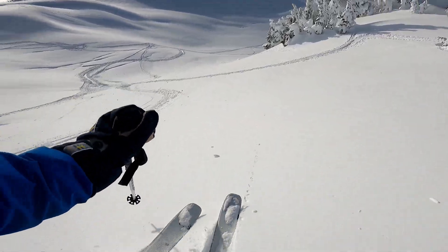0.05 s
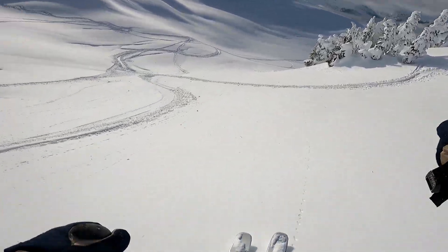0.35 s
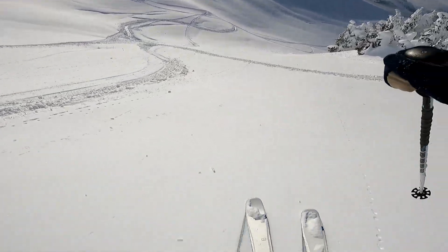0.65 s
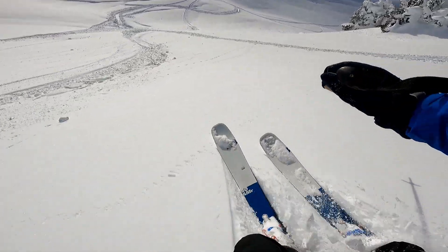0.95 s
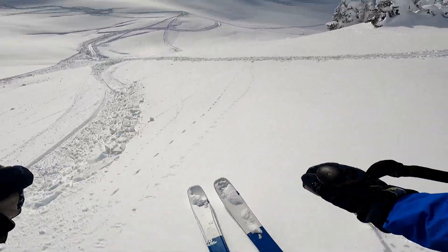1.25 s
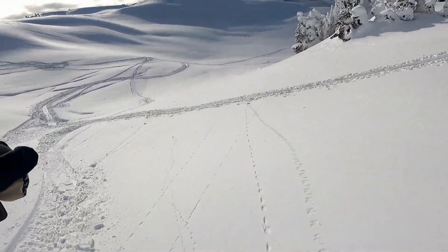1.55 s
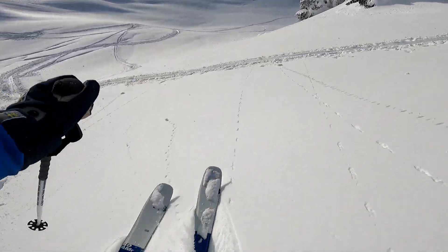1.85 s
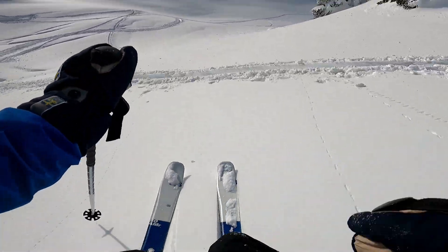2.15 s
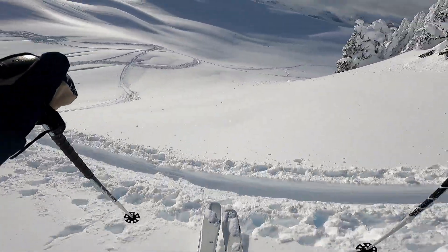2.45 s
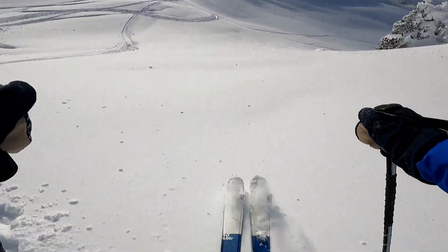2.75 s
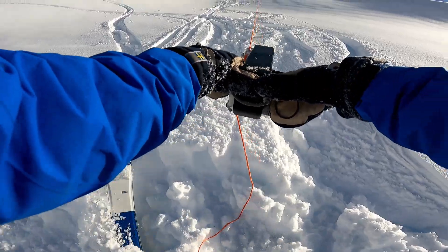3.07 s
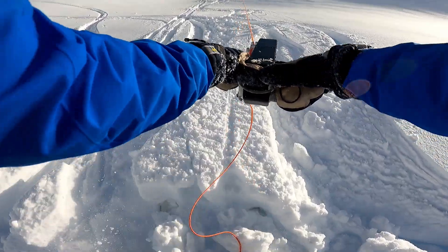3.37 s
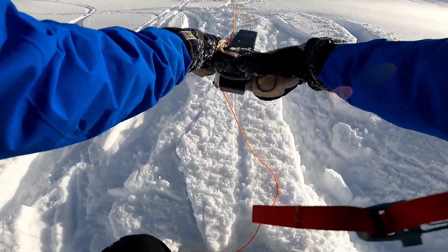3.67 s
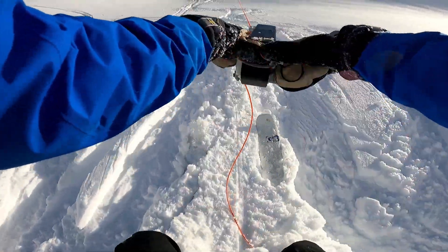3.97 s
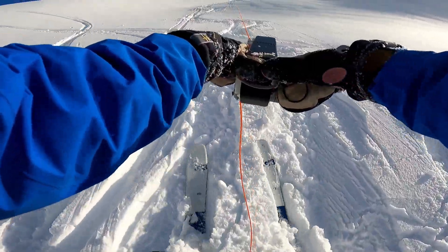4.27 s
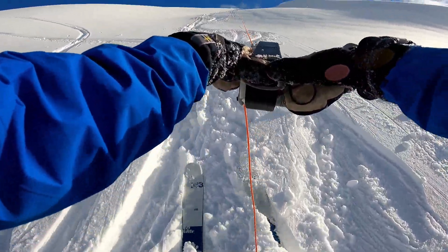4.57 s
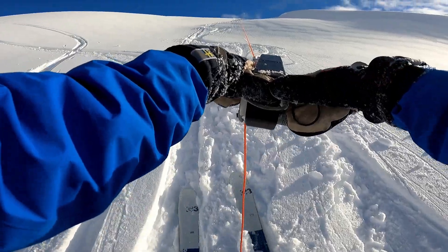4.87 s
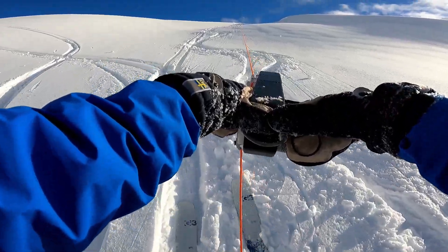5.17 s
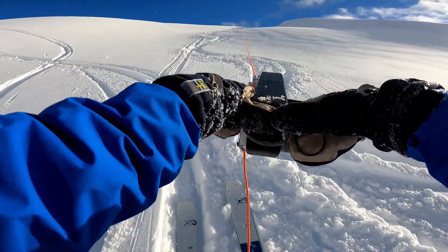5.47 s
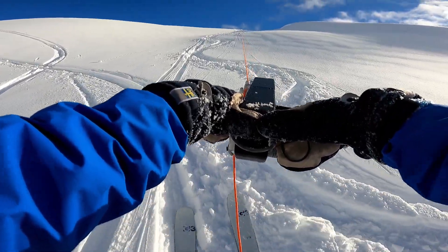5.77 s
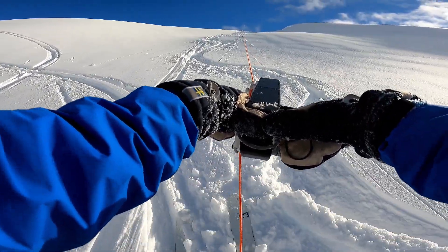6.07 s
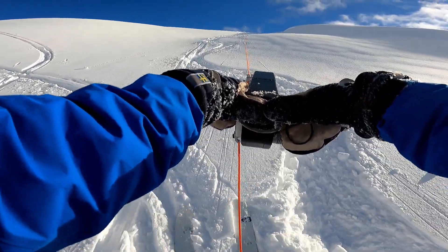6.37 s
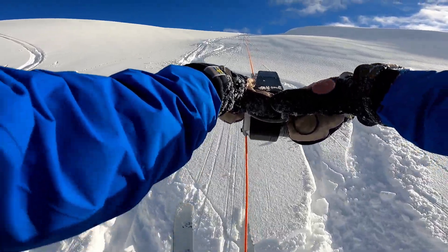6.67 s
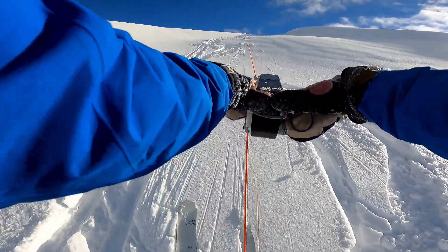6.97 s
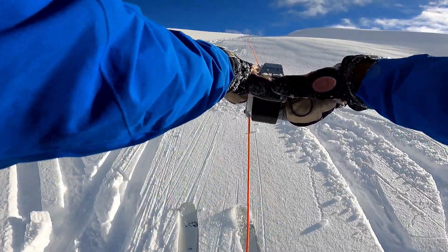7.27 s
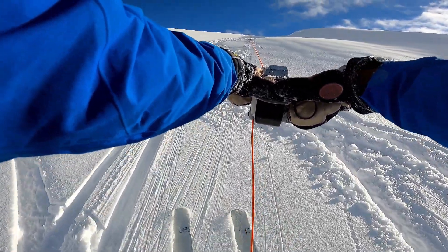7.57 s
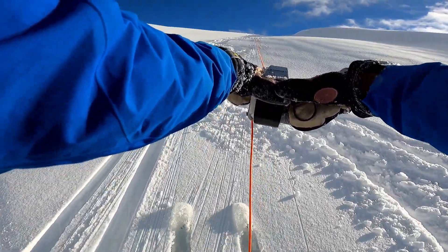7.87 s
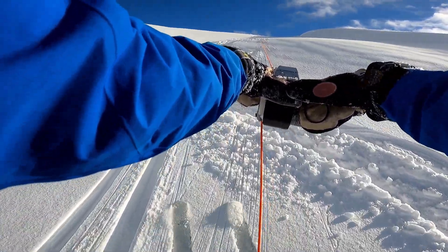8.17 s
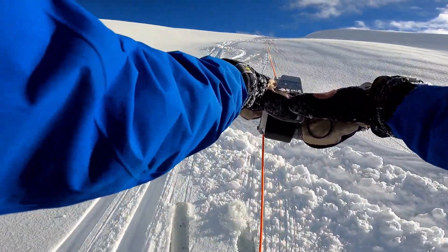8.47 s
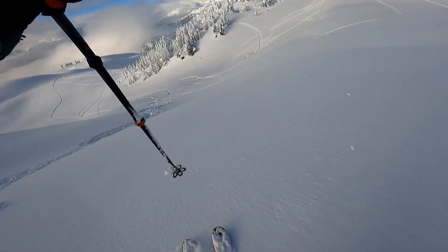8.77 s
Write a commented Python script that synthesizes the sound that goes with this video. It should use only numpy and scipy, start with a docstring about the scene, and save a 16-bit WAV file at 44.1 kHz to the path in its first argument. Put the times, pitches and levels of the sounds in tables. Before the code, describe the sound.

Gusts of wind rumble on a body-worn microphone as a skier turns through powder, the skis crunching and hissing, with a few knocks and a tap on a pole. Abruptly a hand-held electric rope tow takes over close by: its geared motor growls, speeds up, sags under load, then whines steadily with rattling gears over a low rumble of skis. The windy descent cuts back in with two thumps.

```python
"""Gusts of wind buffet a body camera as a skier runs through powder. In each turn the skis crunch the snow and
throw up a hiss; they knock over lumps, and a pole is struck. The scene changes abruptly to a hand-held electric
rope tow: its geared motor growls, speeds up, sags under the load, then whines steadily as it winds in the rope,
its gear teeth rattling the housing. Just as abruptly the scene changes back to the windy descent, with a few
thumps."""
import sys
import numpy as np
from scipy import signal
from scipy.fft import rfft, irfft, next_fast_len
from scipy.io import wavfile
from scipy.ndimage import uniform_filter1d, map_coordinates

SR = 44100
rng = np.random.default_rng(int(sys.argv[2]) if len(sys.argv) > 2 else 0)


def to_wav(sig):
    """Store sig (one row per channel, or 1-D mono) as 16-bit WAV at the path in sys.argv[1].

    Samples outside -1..1 are clipped; the rate is SR.
    """
    pcm = np.clip(np.atleast_2d(sig), -1, 1) * 32767
    pcm = np.round(pcm).astype(np.int16)
    wavfile.write(sys.argv[1], SR, pcm.T)  # frames by channels


N = 398223
TIME, HZ = np.arange(N) / SR, np.fft.rfftfreq(N, 1 / SR)
TOW_START_S, TOW_END_S = 2.836, 8.643
CRUISE_HZ, DRUM_RATIO = 373, 20  # motor turns a second when cruising; motor turns per rope drum turn

# The deep tone of wind on the microphone: pitch_hz, level_db
WIND_COLOUR = [(8.8, -31), (15, 1.5), (43, 3), (85, -1), (128, -5.5), (173, -18), (247, -15.5),
               (400, -25.5), (520, -72), (880, -120)]
# Gusts that rise above the steady airflow: start_s, end_s, boost_db
GUSTS = [(-0.1, 0.246, 5), (0.464, 1.236, 7), (1.684, 2.21, 5), (2.38, 2.596, 5.5), (2.688, 2.84, 8),
         (8.608, 8.752, 8)]

def wind(level_db=-25.5, edge_s=0.013, after_tow_db=0.5):
    """Rushing air shakes the microphone, making a rumble that jumps with each gust."""
    gust_db = sum(db / 2 * (np.tanh((TIME - start) / edge_s) - np.tanh((TIME - end) / edge_s))
                  for start, end, db in GUSTS)
    rumble = coloured(rng.standard_normal(N), read(WIND_COLOUR, HZ))
    buffeting = evened(np.tanh(0.27 * rumble))  # gently squash the peaks
    return gain_of(level_db + after_tow_db * (TIME > TOW_END_S) + gust_db + 1.4 * drift(12)) * buffeting


# Ski turns, each pressing on the edges and letting go: middle_s, half_length_s, load_factor
SKI_TURNS = [(-0.05, 0.25, 0.72), (0.88, 0.35, 1.1), (2.06, 0.46, 1.1), (2.745, 0.26, 0.91)]
# The low crunch of snow being packed: pitch_hz, level_db
PACKING_COLOUR = [(90, 2.5), (190, 6.5), (350, 0.5), (700, -0.5), (1400, -7), (2800, -19), (6000, -57),
                  (12000, -82)]
# The brighter sound of coarse spray: pitch_hz, level_db
SPRAY_COLOUR = [(600, 3), (1500, -0.5), (3000, -2), (4000, -8.5), (6000, -15), (12000, -48)]

def snow_crunch(packing_db=-39, spray_db=-51, after_tow_db=-3.5):
    """Snow packs in tiny collapses and sprays off the ski edges, loudest in the turns."""
    load = sum(peak * np.exp(-abs((TIME - s) / half) ** 1.94) for s, half, peak in SKI_TURNS)
    packing = coloured(rng.standard_normal(N) * gain_of(2 * drift(103)), read(PACKING_COLOUR, HZ))
    spray = coloured(rng.standard_normal(N) * gain_of(2 * drift(400)), read(SPRAY_COLOUR, HZ))
    snow = gain_of(packing_db + 9.5 * load) * packing + gain_of(spray_db + 11 * load) * spray
    return gain_of(after_tow_db * (TIME > TOW_END_S) + drift(5.6)) * snow


# How the powder's hiss rises and falls: time_s, level_db
HISS_LEVEL = [(0.0, -46.5), (0.32, -52), (0.35, -56.5), (0.54, -57), (0.55, -51.5), (0.68, -46),
              (1.22, -45), (1.63, -56.5), (1.67, -52), (1.88, -44), (2.24, -41.5), (2.27, -46), (2.62, -55),
              (2.77, -51)]
# The thin, high tone of flying powder: pitch_hz, level_db
HISS_COLOUR = [(1500, -21), (3000, 1.5), (4200, 0), (5500, -2.5), (7000, -5.5), (9000, -13.5), (12000, -25),
               (14500, -42)]

def powder_hiss(boost_db=2.5, after_tow_db=-60):
    """Fine powder flies off the edges: it builds through each turn and hushes in between."""
    level_db = np.where(TIME > TOW_END_S, after_tow_db, curves(HISS_LEVEL)[0] + boost_db) + drift(17)
    grains = rng.standard_normal(N) * gain_of(drift(400))
    return gain_of(level_db) * coloured(grains, read(HISS_COLOUR, HZ))


# Hard snow and gear hitting the skis: start_s, level_db, pitch_hz, fade_s (time to fall 60 dB)
CLACKS = [(0.183, -18, 1110, .009), (0.4738, -9.5, 1900, 0.0027), (0.5395, -18, 1150, .008),
          (1.2555, -19, 1100, 0.0045), (2.277, -15.5, 720, .012), (2.441, -15, 700, 0.011),
          (2.62, -21, 1700, .008), (2.33, -16, 1000, .012), (2.358, -18, 1300, .01)]

def clacks():
    """Each hard, sharp hit rings for only a few vibrations."""
    out, t = np.zeros(N), np.arange(SR // 4) / SR
    for s, db, hz, fade_s in CLACKS:
        add(out, s, gain_of(db - 60 * t / fade_s) * np.sin(2 * np.pi * hz * t))
    return out


# Skis and gear bumping over lumps: start_s, level_db, pitch_hz, fade_s
KNOCKS = [(.695, -9, 280, 0.043), (.815, -26, 1800, .025), (.864, -21, 700, 0.043),
          (.913, -23, 2300, 0.068), (.922, -15, 600, 0.045), (.992, -15, 577, 0.25),
          (1.039, -12, 513, 0.074), (.997, -17, 1150, .15), (2.056, -20, 1700, .02), (2.11, -11, 220, 0.14),
          (2.21, -21, 3900, 0.025), (2.204, -13, 450, .035), (2.393, -9.5, 280, .05),
          (2.732, -16, 1200, 0.022), (2.787, -7, 452, 0.04), (3.04, -16, 275, 0.062),
          (3.315, -6, 369.2, 0.036), (3.465, -14, 317.8, 0.077), (8.648, -6.5, 400, .07),
          (8.664, -13.5, 1100, 0.019), (8.669, -11, 590, 0.034), (8.747, -6, 320, .04),
          (8.749, -19, 800, 0.023), (8.75, -27, 1900, 0.018)]

def knocks(trim_db=-5.5, spread=1.41):
    """Each bump is a dull crunch: a burst of noise around one pitch that dies quickly."""
    out, t = np.zeros(N), np.arange(SR // 4) / SR
    for s, db, hz, fade_s in KNOCKS:
        band = signal.butter(2, [hz / spread, hz * spread], "band", fs=SR)
        crunch = evened(signal.lfilter(*band, rng.standard_normal(len(t))))
        add(out, s, crunch * gain_of(db + trim_db - 60 * t / fade_s) * np.minimum(t / 0.001, 1))
    return out


def old_tracks(level_db=-28, middle_s=2.36, half_length_s=0.34, pitch_hz=184):
    """A low rumble swells and fades as the skis chatter across old tracks."""
    band = 1 / (1 + (1.42 * np.log2((HZ + 1) / pitch_hz)) ** 4)
    rumble = evened(filtered(rng.standard_normal(N), band))
    return gain_of(level_db) * hump(middle_s, half_length_s) * rumble


# A hit on a ski pole and its bounce: start_s, level_db
POLE_HITS = [(2.7866, 0), (2.7914, -6)]
# The notes the pole rings with: pitch_hz, level_db, fade_s
POLE_NOTES = [(734, -15, .03), (1235, -24, 0.14), (1510, -12.5, 0.022), (3600, -19.5, 0.016)]

def pole():
    """A struck pole rings briefly with several notes at once."""
    out, t = np.zeros(N), np.arange(SR // 4) / SR
    ring = sum(gain_of(db - 60 * t / fade_s) * np.sin(2 * np.pi * hz * t) for hz, db, fade_s in POLE_NOTES)
    for s, db in POLE_HITS:
        add(out, s, gain_of(db) * ring * np.minimum(t / 0.0006, 1))
    return out


# The motor labours, picks up, sags under the skier's weight, then cruises: time_s, speed_hz
MOTOR_SPEED = [(2.84, 290), (2.93, 302), (2.965, 288), (3.0, 322), (3.045, 378.5), (3.27, 359.0),
               (3.39, 351.2), (3.61, 294.5), (3.72, 289.5), (3.8, 293.5), (3.94, 284.6), (4.12, 286.8),
               (4.25, 306.1), (4.42, 308.8), (4.65, 358.4), (5.32, 377.0), (5.62, 379.5), (6.25, 370.1),
               (6.78, 373.3), (7.01, 379.3), (7.16, 375.4), (7.84, 365.7), (8.63, 373.2)]

def rope_tow(rattle_db=-21.5, db_per_octave=7.5, brighten_s=0.15, catch_s=0.031, sing_rise_s=0.07):
    """The geared motor starts with a dull growl, then brightens and sings as it spins up."""
    age = np.maximum(TIME - TOW_START_S, 0)
    hz = curves(MOTOR_SPEED)[0]
    turns = np.cumsum(hz) / SR  # motor turns so far
    rattle = shifting_rattle(gear_rattle(turns), turns)
    dull = muffled(rattle, 8000)
    brightness = np.minimum(age / brighten_s, 1) ** 2
    # louder at higher speed, and quiet for a moment until the gears catch
    effort_db = db_per_octave * np.log2(hz / CRUISE_HZ) - 10.5 * np.exp(-age / catch_s)
    rattle = gain_of(rattle_db + effort_db) * (dull + brightness * (rattle - dull))
    seated = np.minimum(age / sing_rise_s, 1)  # the gears sing as the rope pulls them together
    singing = gain_of(effort_db - 1) * soft_whine(hz, turns) + high_whine(turns) + gear_tones(hz, turns)
    return rattle + seated * singing + growl(turns, TOW_START_S + brighten_s / 2)


def growl(turns, middle_s, level_db=-28, half_length_s=0.11):
    """The starting motor gives a short, rough tone at nearly twice its turning speed."""
    rough_tone = evened((.5 + drift(170)) * np.sin(2 * np.pi * 1.95 * turns))
    return gain_of(level_db) * hump(middle_s, half_length_s) * rough_tone


# Rates at which gear teeth meet, lifting or cutting the rattle there: times_motor_speed, boost_db
TOOTH_RATES = [(6, -3), (9, 3), (12, 6.5), (15, 7), (18, 6.5), (21, 7.5), (24, 10), (27, 7.5), (30, 4),
               (33, 8), (36, -12)]

def gear_rattle(turns, repeat_share=0.58, slack_turns=0.014, spread=0.15, size=4096):
    """Flaws in the teeth repeat with every turn of the rope drum; loose chatter fills the gaps."""
    overtone = np.arange(size // 2 + 1)
    multiple = overtone / DRUM_RATIO
    boost_db = sum(db / (1 + ((multiple - k) / spread) ** 2) for k, db in TOOTH_RATES)
    boost_db -= 6 * (overtone % 2)  # a wheel at twice the drum's speed dominates: odd overtones are weaker
    phases = np.exp(2j * np.pi * rng.random((2, len(multiple))))
    flaws = irfft(gain_of(boost_db) * phases * (multiple < 45))  # one drum turn, for each tooth face
    shaken = turns + slack_turns * drift(70)  # slack between the teeth shakes the timing
    position = shaken / DRUM_RATIO % 1 * size
    front, back = (map_coordinates(face, [position], order=3, mode="grid-wrap") for face in flaws)
    lean = .8 * drift(0.59)  # contact wanders between the two faces as the pull changes
    repeating = evened(np.cos(lean) * front + np.sin(lean) * back)
    tooth_buzz = sum((gain_of(db) - 1) * drift(spread * CRUISE_HZ) * np.cos(2 * np.pi * k * turns)
                     for k, db in TOOTH_RATES)
    chatter = evened(rng.standard_normal(N) + 0.14 * tooth_buzz)
    # off-centre wheels press harder once in each of their turns
    pressure_db = 0.5 * throb(turns) + 0.5 * np.cos(2 * np.pi * turns / 4)
    shaking = np.sqrt(repeat_share) * repeating + np.sqrt(1 - repeat_share) * chatter
    shaking *= gain_of(pressure_db + 0.54 * drift(380))
    return coloured(patchy(shaking), housing_db(HZ))


def throb(turns, sharpness=0.9):
    """An off-centre wheel presses the teeth together twice in each turn of the drum."""
    push = np.exp(sharpness * np.cos(2 * np.pi * 2 * turns / DRUM_RATIO))
    return evened(push - push.mean())


def patchy(x, depth_db=1.48, full_depth_hz=3500):
    """The treble flickers in patches a few hundred hertz wide and about a tenth of a second long."""
    hz, _, spectra = signal.stft(x, SR, nperseg=512)
    patches = uniform_filter1d(rng.standard_normal(spectra.shape), size=4, axis=0)
    patches = evened(uniform_filter1d(patches, size=20, axis=1))
    flicker_db = depth_db * np.minimum(hz / full_depth_hz, 1)[:, None] * patches
    return signal.istft(spectra * gain_of(flicker_db), SR, nperseg=512)[1][:N]


# The overall tone of the case around the gears: pitch_hz, level_db
HOUSING_COLOUR = [(100, -18.5), (260, -9), (520, -8.5), (720, 3.5), (1000, 0), (1400, -11.5), (1750, -7.5),
                  (2400, -6.5), (3100, -2.5), (4100, -14), (5500, -20.5), (8000, -30), (11000, -44),
                  (15000, -60.5)]
# Pitches at which that case rings: pitch_hz, width_hz, boost_db
HOUSING_RINGS = [(417.6, 48, 11.5), (588, 108, 6.5), (3493, 510, 8.5), (4110, 250, 2), (6750, 1400, 3),
                 (13000, 860, 7)]

def housing_db(hz):
    """The housing passes the gears' shaking to the air, some pitches more strongly than others."""
    return read(HOUSING_COLOUR, hz) + ringing_db(HOUSING_RINGS, hz)


# Boosts to four parts of the rattle, low to high: time_s, body_db, hollow_db, rasp_db, treble_db
RATTLE_BANDS = [(2.85, 7, -5, 3, 8), (2.95, 2.5, -2, 5, 6), (3.15, 0.5, -4, 3, 4), (4.0, 1, -7, -4, 2.5),
                (4.6, 1.5, -6, 5.5, 2.5), (5.2, -2.5, -3, -0.5, 3), (5.9, -1.5, -3, -1, 4.5),
                (7.0, 0, 1.5, 4, -3), (7.7, 0.5, 3, 4.5, -2.5), (8.5, 1, 5.5, 2, 1.5)]

def shifting_rattle(rattle, turns, surge_db=1, chug_db=1.3):
    """The rattle slowly changes tone, surges as the rope comes taut and chugs as the drum tugs."""
    body, treble = muffled(rattle, 1150, steepness=8), rattle - muffled(rattle, 7500)
    hollow = moving_band(rattle, 4.1 * turns, width_hz=480)
    rasp = moving_band(rattle, 7.5 * turns, width_hz=600)
    for db, band in zip(curves(RATTLE_BANDS), (body, hollow, rasp, treble)):
        rattle = rattle + (gain_of(db) - 1) * band
    ringing = moving_band(rattle, 2920 * TIME, width_hz=1000)
    surge = gain_of(surge_db * hump(middle_s=3.06, half_length_s=0.1))
    drum = 2 * np.pi * turns / DRUM_RATIO
    chug = gain_of(chug_db * (np.cos(drum) + np.cos(2 * drum)))  # a hard tug, then a light one halfway
    return rattle + (surge - 1) * ringing + (chug - 1) * body


# The motor's lesser tones, balanced for cruising speed: times_motor_speed, level_db
SOFT_TONES = [(1.05, -39.5), (1.15, -41.5), (1.25, -41), (1.75, -37), (1.8, -44.5), (2.15, -43.5),
              (2.45, -41.5), (3.2, -46)]

def soft_whine(hz, turns, waver_db=2.5, jitter_turns=0.0022):
    """Tones swell and fade as the speed carries them past the pitches where the housing rings."""
    shaky, out = turns + jitter_turns * drift(23.5), np.zeros(N)
    for multiple, db in SOFT_TONES:
        swell_db = housing_db(multiple * hz[::64]) - housing_db(multiple * CRUISE_HZ)
        level_db = db + np.interp(TIME, TIME[::64], swell_db) + waver_db * drift(10)
        out += gain_of(level_db) * np.sin(2 * np.pi * (multiple * shaky + rng.random()))
    return np.sqrt(2) * out


# The main tones of teeth meeting: times_motor_speed, flutter_share (0-1), level_db, flutter_hz
GEAR_TONES = [(1.6, .1, -46, 60), (2, .08, -38, 40), (3, .14, -35.7, 60), (4, .08, -43, 60),
              (5.85, .9, -49.5, 110), (6, .2, -44, 50), (6.65, .2, -52, 50), (8.05, .4, -54, 50),
              (9.05, .48, -36.6, 65), (10, .1, -44, 50), (12, .8, -46.5, 100), (12.4, .4, -58, 60),
              (13.3, .08, -47.5, 60)]
# Ringing pitches that lift any tone passing through: pitch_hz, width_hz, boost_db
SINGING_PITCHES = [(460, 50, 11), (730, 60, 1), (890, 190, 11), (1450, 100, 5.5), (2090, 260, 14),
                   (2740, 260, 5), (3440, 330, 8), (3800, 200, 10), (4580, 400, 6.5)]
# One gear tone swells or fades for a moment: middle_s, half_length_s, times_motor_speed, boost_db
TONE_SWELLS = [(2.995, .04, 6, 4.5), (2.99, .04, 2, 8), (3.6, .06, 9.05, 3), (2.87, .08, 9.05, -8),
               (2.94, .035, 10, 11), (2.985, .04, 12, 4), (2.98, .04, 8.05, 10), (2.85, .06, 12, -8),
               (2.85, .05, 10, -5), (2.88, .14, 13.3, -10), (2.9, .18, 4, -9), (2.89, .12, 3, -14),
               (2.855, .02, 8.05, 14), (3.2, .2, 3, -5), (4.3, 1.0, 8.05, 7), (3.98, .18, 12.4, 11),
               (3.66, .09, 12.4, 8), (4.0, .12, 12, 4), (3.45, .12, 13.3, 3), (3.5, .06, 12, -5),
               (5.6, .6, 10, -3.5), (3.15, .25, 2, 5), (3.25, .25, 6, 4), (3.3, .18, 4, 6),
               (3.95, .45, 4, 10), (3.95, .35, 12, 3), (3.9, .4, 12.4, 6), (3.95, .25, 9.05, -2.5),
               (3.95, .35, 2, -4), (3.7, .7, 13.3, 4), (4.6, .15, 13.3, 3), (4.7, .3, 4, -7),
               (4.85, .35, 6, 4.5), (4.8, .3, 12, 5), (4.9, .3, 10, 3), (5.5, .6, 9.05, 2.8),
               (5.7, .25, 2, 3), (6.26, .1, 6, 12), (5.45, .25, 6, -4), (6.8, .4, 2, 4.5),
               (6.95, .4, 3, -8), (6.9, .35, 10, 2), (7.1, .25, 4, -6), (7.0, .25, 6, 3), (8.0, .6, 4, 3),
               (8.0, .7, 3, 3.5), (8.0, .7, 10, -4), (7.95, .45, 9.05, 3), (4.35, .2, 8.05, 4),
               (4.3, .15, 9.05, 2.5), (6.45, .08, 6, 5), (6.8, .3, 6, -4)]

def gear_tones(hz, turns, looseness=0.6, labour_flutter=0.6, throb_db=1.1):
    """Meeting teeth sing clear tones, which the slow wheels and loose play set fluttering."""
    out, drum, speed = np.zeros(N), turns[::32] / DRUM_RATIO, np.minimum(hz / CRUISE_HZ, 1)
    steps = np.arange(-6, 7)  # side tones lie whole drum speeds above and below each tone
    heights = np.exp(-abs(steps) / 3.1) * np.where(steps % 2, .3, 1) * (steps != 0)
    for multiple, share, db, flutter_hz in GEAR_TONES:
        side_tones = np.exp(2j * np.pi * (np.outer(steps, drum) + rng.random((len(steps), 1)) - .5))
        wheels = np.interp(TIME, TIME[::32], heights @ side_tones / np.linalg.norm(heights))
        play = looseness * (drift(flutter_hz) + 1j * drift(flutter_hz)) / np.sqrt(2)
        unsteady = share + (1 - share) * labour_flutter * (1 - speed)  # a labouring motor flutters more
        flutter = np.sqrt(1 - unsteady) + np.sqrt(unsteady / (1 + looseness ** 2)) * (wheels + play)
        swell_db = sum(boost * hump(s, half) for s, half, k, boost in TONE_SWELLS if k == multiple)
        level_db = db + ringing_db(SINGING_PITCHES, multiple * hz) + swell_db + 0.5 * drift(3)
        level_db += throb_db * share * throb(turns) * speed ** 4
        tone = np.exp(2j * np.pi * (multiple * turns + rng.random()))
        out += gain_of(level_db) * (flutter * tone).real
    return np.sqrt(2) * out


# How the high gear whine rises and falls: time_s, level_db
HIGH_WHINE_LEVEL = [(3.0, -58), (4.7, -69), (6.0, -45), (7.1, -59), (7.7, -41.5), (8.2, -47), (8.6, -53)]

def high_whine(turns, multiple=18.2, width_hz=230, throb_db=5):
    """A high, fuzzy gear tone throbs with a slow wheel, once every ten motor turns."""
    fuzz = ((drift(width_hz) + 1j * drift(width_hz)) * np.exp(2j * np.pi * multiple * turns)).real
    pulse = gain_of(throb_db * np.cos(2 * np.pi * turns / 10))
    return gain_of(curves(HIGH_WHINE_LEVEL)[0]) * evened(fuzz * pulse)


# How loud the skis are under tow: time_s, level_db
GLIDE_LEVEL = [(2.85, -31.5), (3.05, -32), (3.4, -36.5), (3.7, -39), (4.6, -45.5), (6.4, -43), (8.6, -46.5)]
# Their deep tone: pitch_hz, level_db
GLIDE_COLOUR = [(20, 1), (50, -0.5), (100, -2.5), (200, -10.5), (400, -9), (1000, -25), (5000, -99)]

def glide(lumpy_db=1.5):
    """Skis pulled over tracked snow make a low, uneven rumble."""
    rumble = coloured(rng.standard_normal(N), read(GLIDE_COLOUR, HZ))
    return gain_of(curves(GLIDE_LEVEL)[0] + lumpy_db * drift(15)) * rumble


# The tow is mono at first and opens into stereo late on: time_s, width_share (0-1)
STEREO_WIDTH = [(6.35, 0), (6.7, 0.15), (7, 0.28), (7.6, 0.34), (8.2, 0.43)]
# How alike the left and right microphone openings sound: pitch_hz, likeness_share (0-1)
MIC_LIKENESS = [(60, 0.78), (130, 1), (290, 0.4), (630, 1), (1380, 0.37), (3010, 1), (6590, 0.39),
                (14400, 0.27)]
# The tone both openings add: pitch_hz, boost_db
MIC_COLOUR = [(800, -5), (1400, 8), (2300, -5), (3400, 1.5), (5500, 8), (6700, 4), (7800, 6), (13000, 19)]
# How much louder the left one is: pitch_hz, left_minus_right_db
MIC_BALANCE = [(60, -1), (99, 8), (160, -5), (270, 1), (440, 1), (730, 0), (1190, 0), (1960, 0),
               (3230, 5.5), (5320, -2.5), (8760, 2), (14400, -4)]
# How far the wave at the left one runs ahead: pitch_hz, lead_radians
MIC_LEAD = [(0, 9.5), (2150, -2.5), (2500, 3.5), (4570, -2.1), (5860, -0.6), (7750, -2.5), (8270, 0.5),
            (11500, -3), (12900, 6), (13300, 2), (13500, 3), (14600, -0.1)]

def microphone_openings(tow, echo_s=0.0068):
    """Two openings hear the tow with their own delay and tone, plus tiny echoes off the sleeves."""
    t = np.arange(SR // 20) / SR
    echoes = rng.standard_normal(len(t)) * np.exp(-t / echo_s)
    scatter = signal.oaconvolve(tow, echoes / np.linalg.norm(echoes))[:N]
    alike, colour = read(MIC_LIKENESS, HZ), gain_of(read(MIC_COLOUR, HZ))
    direct = filtered(tow, colour * np.sqrt((1 + alike) / 2))
    apart = filtered(scatter, colour * np.sqrt((1 - alike) / 2))
    leftward = gain_of(read(MIC_BALANCE, HZ) / 2) * np.exp(.5j * read(MIC_LEAD, HZ))
    pair = np.array([filtered(direct + apart, leftward), filtered(direct - apart, 1 / leftward)])
    return tow + curves(STEREO_WIDTH)[0] * (pair - tow)


# Bursts of air as the descent returns: start_s, level_db, pitch_hz, length_s
AIR_THUMPS = [(8.646, -5.5, 171, 0.015), (8.743, -10, 218, 0.015)]

def air_thumps():
    """A burst of air hits the microphone and shakes it for a few low vibrations."""
    out, t = np.zeros(N), np.arange(SR // 4) / SR
    for s, db, hz, length_s in AIR_THUMPS:
        swell = np.sin(np.pi * np.minimum(t / length_s, 1))
        add(out, s, gain_of(db) * swell * np.sin(2 * np.pi * hz * t))
    return out


def gain_of(db):
    """Turns decibels into a number to multiply by."""
    return 10 ** (np.asarray(db) / 20)


def evened(x):
    """Scales a sound to an average strength (rms) of 1."""
    return x / np.sqrt(np.mean(x ** 2) + 1e-20)


def read(points, hz):
    """Looks up a table's value at any pitch, sliding between its rows."""
    pitches, values = np.transpose(points)
    return np.interp(np.log(hz + 1), np.log(pitches + 1), values)


def curves(rows):
    """Joins a table's timed rows into one curve for each value column."""
    times, *columns = np.transpose(rows)
    return [np.interp(TIME, times, column) for column in columns]


def hump(middle_s, half_length_s):
    """A smooth rise to 1 and back down."""
    return np.exp(-((TIME - middle_s) / half_length_s) ** 2)


def drift(hz, step=20):
    """A smooth random wobble of strength 1, with rates up to about hz."""
    coarse = TIME[::step]
    smoothing = np.exp(-(np.fft.rfftfreq(len(coarse), step / SR) / hz) ** 2)
    wobble = irfft(rfft(rng.standard_normal(len(coarse))) * smoothing, len(coarse))
    return np.interp(TIME, coarse, evened(wobble))


def add(mix, start_s, sound):
    """Mixes a sound in at start_s."""
    part = mix[round(start_s * SR):][:len(sound)]
    part += sound[:len(part)]


def filtered(x, response):
    """Multiplies each pitch in a sound by a factor, given for every entry of HZ."""
    size = next_fast_len(N)
    return irfft(rfft(x, size) * np.interp(np.fft.rfftfreq(size, 1 / SR), HZ, response), size)[..., :N]


def coloured(x, db):
    """Shapes a sound's tone, then scales it to strength 1."""
    return evened(filtered(x, gain_of(db)))


def muffled(x, top_hz, steepness=4):
    """Fades out the pitches above top_hz."""
    return filtered(x, 1 / (1 + (HZ / top_hz) ** steepness))


def moving_band(x, cycles, width_hz):
    """Keeps the part of a sound near one pitch, given as a running count of cycles."""
    spin = np.exp(2j * np.pi * cycles)
    smoothing = signal.butter(2, width_hz / 2, fs=SR, output="sos")
    return 2 * (spin * signal.sosfiltfilt(smoothing, x / spin)).real


def ringing_db(rings, hz):
    """The boost a pitch gets from lying near pitches where something rings."""
    return sum(db / (1 + (2 * (hz - pitch) / width) ** 2) for pitch, width, db in rings)


def scene():
    """The tow scene lies between two parts of the descent, with abrupt changes of scene and sharp hits on top."""
    towing = uniform_filter1d(1. * ((TIME > TOW_START_S) & (TIME < TOW_END_S)), size=64)
    tow = microphone_openings(rope_tow()) + glide()
    descent = wind() + snow_crunch() + powder_hiss() + old_tracks()
    soften = signal.butter(4, 5500, fs=SR, output="sos")
    hits = signal.sosfilt(soften, clacks() + knocks() + pole() + air_thumps())
    return towing * tow + (1 - towing) * descent + hits


def record(dry, ceiling=0.47, top_hz=15100):
    """The camera rounds off the loudest peaks, then cuts the highest treble."""
    rounded = dry / (1 + (dry / ceiling) ** 8) ** (1 / 8)
    treble_cut = signal.firwin(511, top_hz, window=("kaiser", 9), fs=SR)
    return signal.oaconvolve(rounded, treble_cut[None], "same")


dry = scene()
out = record(dry)
to_wav(out)
```